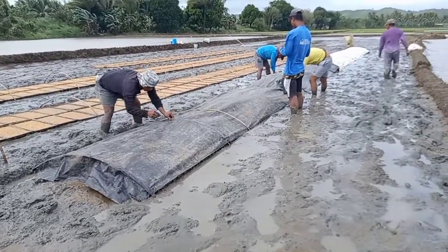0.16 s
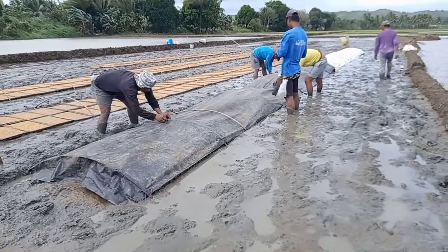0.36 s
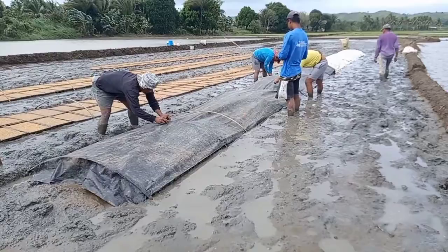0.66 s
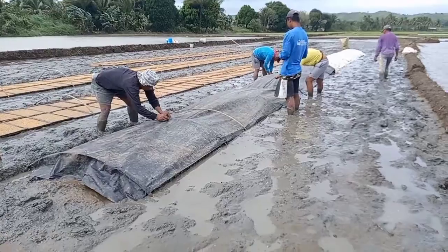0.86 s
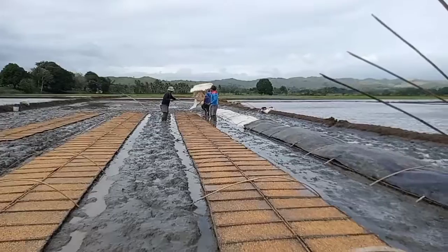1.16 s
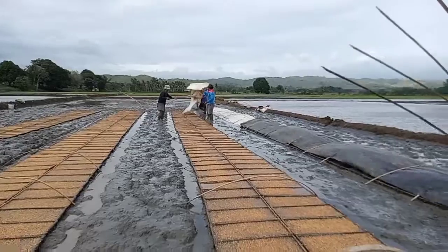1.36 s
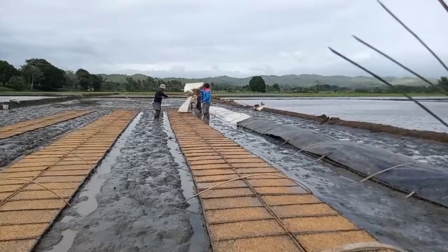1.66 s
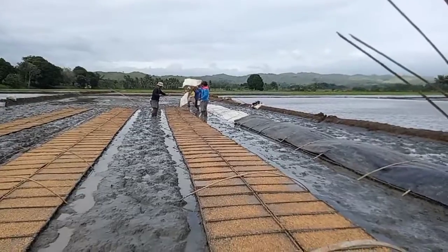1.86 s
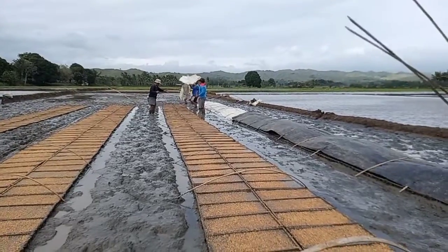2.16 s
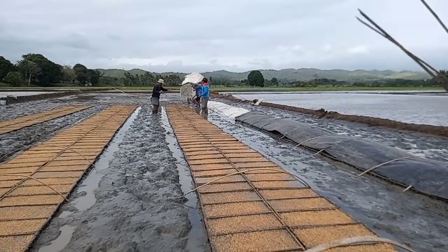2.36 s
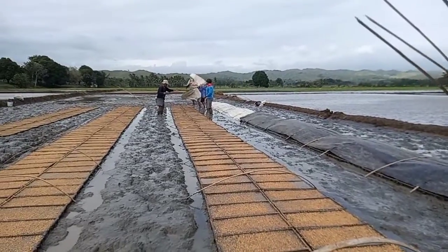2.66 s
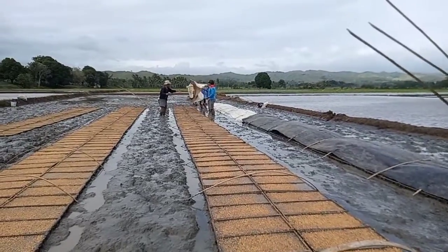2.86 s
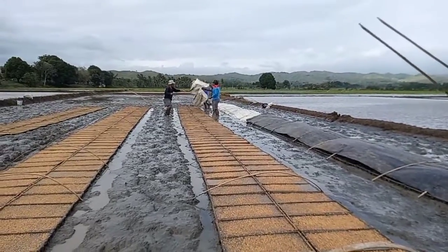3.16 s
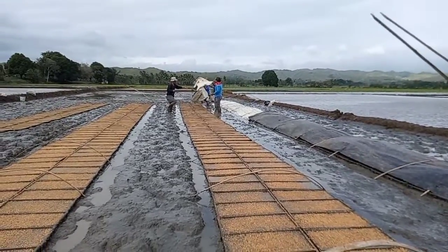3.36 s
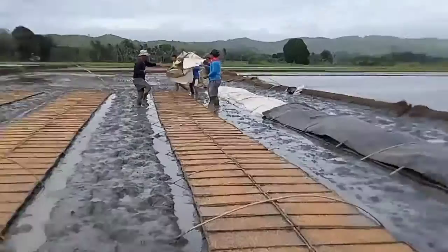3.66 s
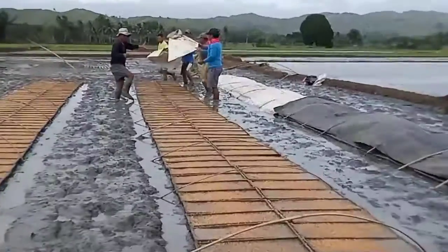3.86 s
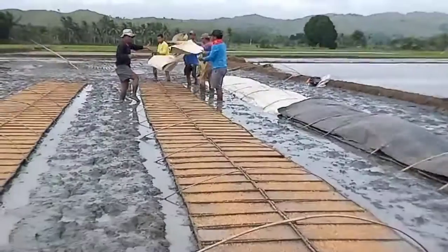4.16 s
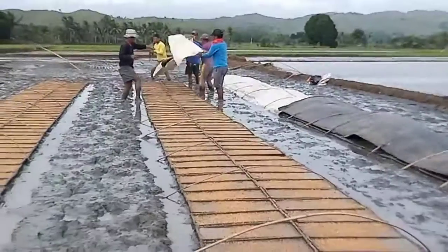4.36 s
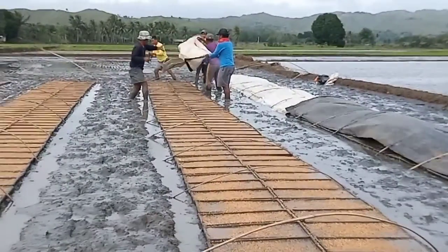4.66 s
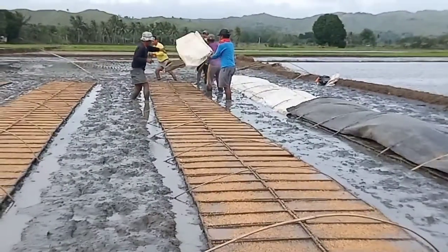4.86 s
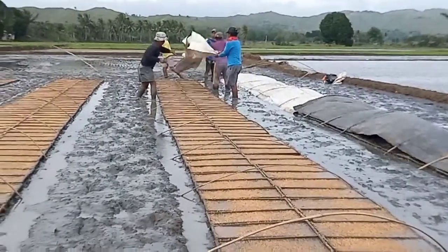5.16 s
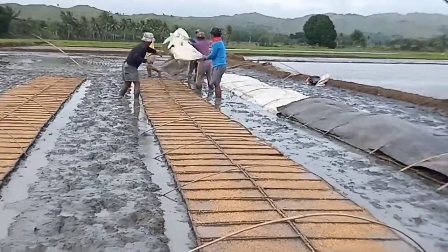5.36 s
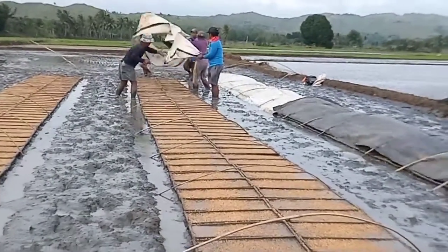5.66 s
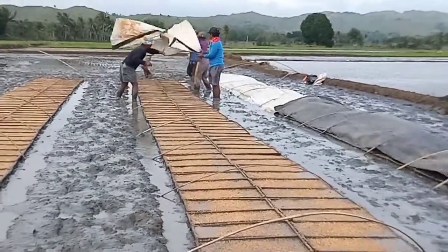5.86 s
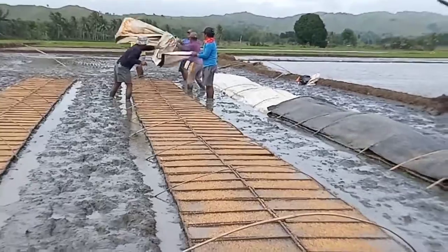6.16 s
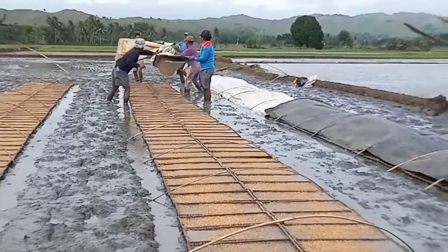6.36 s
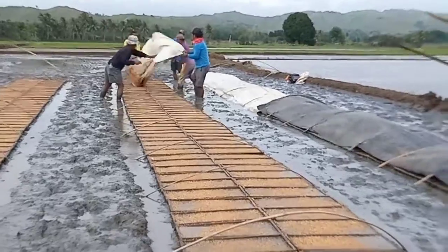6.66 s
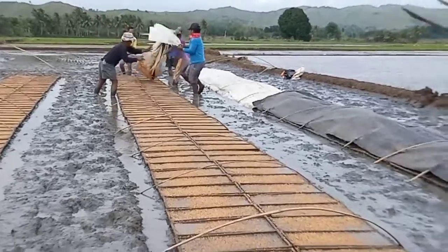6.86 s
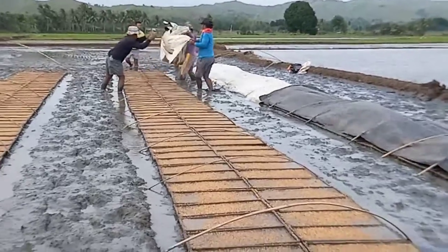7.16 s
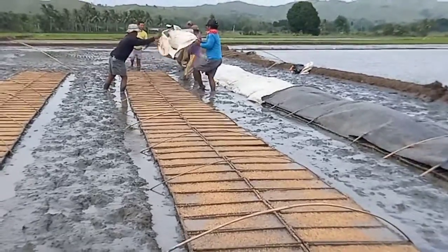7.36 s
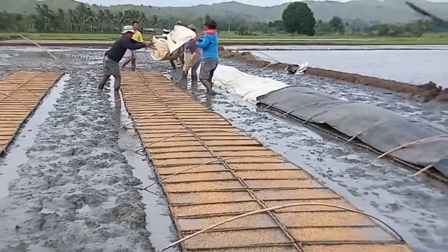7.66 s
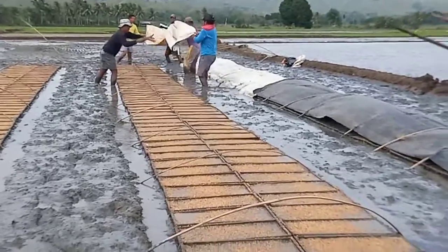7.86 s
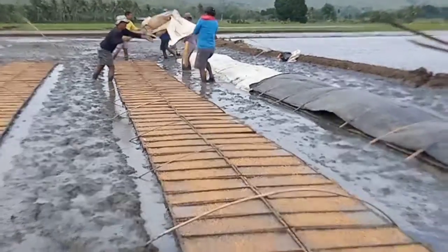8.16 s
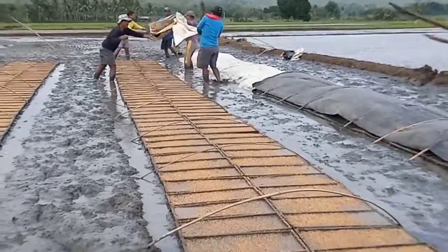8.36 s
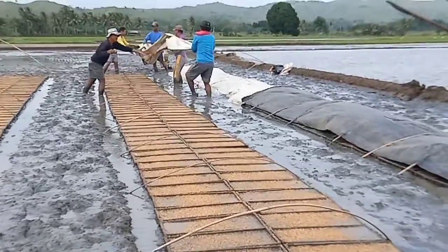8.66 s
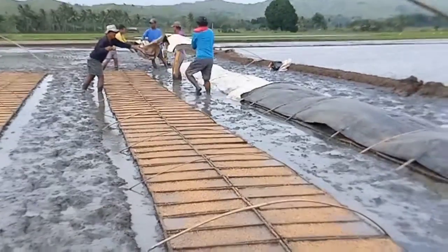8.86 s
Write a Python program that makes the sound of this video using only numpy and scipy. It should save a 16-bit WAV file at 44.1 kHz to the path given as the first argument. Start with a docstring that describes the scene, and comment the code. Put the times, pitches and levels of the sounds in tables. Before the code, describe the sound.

Rough wind hits an unprotected microphone in an open field, rumbling and roaring from the start. It slackens, swells and lands in quick buffets, with a tearing rasp when it blows hardest and a faint airy hiss behind. A few small, close clicks are heard among the gusts. Just past halfway everything drops briefly to dead silence, then the same uneven wind comes straight back.

```python
"""Wind over an open, wet field hits the bare microphone of a handheld camera. From the start, air
swirling at the microphone's opening makes a rumble, a roar and, when it blows hard, a rasp, over a
faint hiss. Soon lulls and gusts slacken and swell it, and single swirls land as short, rough buffets.
The sound cuts out for an instant at 1.1 s. A few light ticks come between 2.8 and 5.5 s; among them,
at 4.8 s, it cuts out again for a third of a second. The wind then blows on to the end at 9 s."""
import sys
import numpy as np
from scipy import signal
from scipy.fft import rfft, irfft
from scipy.io import wavfile
from scipy.ndimage import uniform_filter1d, minimum_filter1d

SR = 44100
rng = np.random.default_rng(int(sys.argv[2]) if len(sys.argv) > 2 else 0)


def master(y):
    """Save y as 16-bit WAV."""
    cut = np.clip(np.atleast_2d(y).T, -1, 1)
    pcm = np.round(cut * 32767)  # scale
    wavfile.write(sys.argv[1], SR, pcm.astype(np.int16))


N = 397782
TIME, HZ = np.arange(N) / SR, np.fft.rfftfreq(N, 1 / SR)


def amp(db):
    """Turns decibels into a number to multiply by."""
    return 10 ** (np.asarray(db) / 20)


def unit_power(x):
    """Scales a signal to an average power of 1."""
    return x / np.sqrt(np.mean(x ** 2) + 1e-20)


def curve_at(points, hz):
    """Reads a curve of (frequency, value) points, joined by straight lines on an octave scale."""
    point_hz, value = np.transpose(points)
    return np.interp(np.log(hz + 1), np.log(point_hz + 1), value)


def coloured(x, spectrum):
    """Gives a sound a tone colour, with a filter that rings after a push lands, never before."""
    log_gain = np.log(amp(curve_at(spectrum, abs(np.fft.fftfreq(8192, 1 / SR)))))
    ringing = np.fft.ifft(np.exp(np.conj(signal.hilbert(log_gain)))).real[:4096]
    return signal.oaconvolve(x, ringing)[:N]


def swirls(slow_hz, fast_hz):
    """The random wobble of swirling air, equally strong in every octave between two rates."""
    cut_slow = (HZ / slow_hz) ** 2 / (1 + (HZ / slow_hz) ** 2)
    shape = cut_slow / np.sqrt(HZ + 1) / (1 + (HZ / fast_hz) ** 4)
    return unit_power(irfft(rfft(rng.standard_normal(N)) * shape, N))


def flutter(wobble, depth_db, span_s):
    """A volume that follows the wobble while its average power over the span stays even."""
    gain = amp(depth_db * 2 * np.tanh(wobble / 2))
    return gain / np.sqrt(uniform_filter1d(gain ** 2, int(span_s * SR) + 1) + 1e-9)


def swell(centre, length, steepness=1):
    """Goes from 0 to 1 and back as a body of air passes: a steep front, then a softer tail."""
    offset = 2 * (TIME - centre) / length
    near, shape = abs(offset) < 4, np.zeros(N)
    offset = offset[near]
    front, tail = abs(steepness * offset) ** 4.1, abs(offset / steepness) ** 3.1
    shape[near] = np.exp(-.55 * np.where(offset < 0, front, tail))
    return shape


# Slow changes in the air. A lean below zero makes the roar hollow; above zero, higher.
# (time [s], flutter depth [dB], rasp brightness [dB], hiss level [dB], lean [dB])
AIR_CHANGES = [(0, 2, 5, -71, -0.5), (1.1, 2.5, 4.5, -62, 1), (1.3, 3, 1, -66.5, 1), (2.2, 6, -3, -54, -3),
               (3.4, 4, -2, -55.5, -1), (4.5, 4, 1.5, -53, 0), (5.8, 3, 2.5, -53, 1),
               (7.299, 4, 1, -61, 1.5), (7.701, 5, 3.5, -62.5, 3.5), (8.3, 3.5, -6.5, -57.5, -0.5),
               (9.002, 4.5, 3.5, -58.5, 3.5)]
def air():
    """The air's slowly drifting flutter depth, brightness, hiss level and lean."""
    times, *columns = np.transpose(AIR_CHANGES)
    return [np.interp(TIME, times, column) for column in columns]


def small_swirls(per_second=9, life_s=0.015, strength=1.4):
    """Small swirls land at random, lift the wind's force quickly and die away."""
    lift = np.zeros(N)
    for place, size, life in rng.random((int(per_second * N / SR), 3)):
        part = lift[int(place * N):][:SR // 5]
        age = TIME[:len(part)] / (life_s * (.5 + life))
        part += 2 * strength * size * np.minimum(10 * age, 1) * np.exp(-age ** 2)
    return lift - lift.mean()


# The wind between gusts.
# (time [s], force [dB], rumble at the usual force [dB], rasp at the usual force [dB])
BREEZE = [(0, -19.5, -22.5, -32), (0.42, -14.5, -25.5, -41), (1.127, -22.5, -21.5, -34),
          (1.135, -29.5, -20.5, -36.5), (1.98, -28.5, -19.5, -48), (2.64, -25, -17.5, -45),
          (3.16, -19.5, -20.5, -53), (3.42, -31, -16, -44), (4.07, -28, -15.5, -45),
          (4.481, -18.5, -18.5, -44.5), (5.479, -19.5, -19, -42.5), (6.17, -24.5, -21, -36.5),
          (6.91, -24, -22.5, -39), (7.49, -20.5, -24.5, -34.5), (7.519, -27, -28, -39),
          (8.1, -32.5, -15.5, -40.5), (8.16, -15, -25, -47), (9.02, -18, -20.5, -46)]
def flow(usual_force_db=-20, rumble_growth=.44, rasp_growth=1.34):
    """One force sets three levels [dB]: the roar matches it, the rumble grows less, the rasp more."""
    times, *columns = np.transpose(BREEZE)
    force_db, rumble_db, rasp_db = (np.interp(TIME, times, column) for column in columns)
    force_db += lulls() + gusts() + small_swirls() * air()[0]
    extra_db = force_db - usual_force_db
    return rumble_db + rumble_growth * extra_db, force_db, rasp_db + rasp_growth * extra_db


def rough_flow(lumpiness=(.65, .8, .7), rasp_roughness=1.1, calm_db=-39):
    """Rumble, roar and rasp levels [dB] once swirls and buffets have shaken the flow."""
    depth_db = air()[0]
    lumps = swirls(slow_hz=4.1, fast_hz=53.4)
    rumble, roar, rasp = (amp(level_db) * flutter(lumps, share * depth_db, span_s=0.13)
                          for level_db, share in zip(flow(), lumpiness))
    rumble, roar, rasp = buffets(rumble, roar, rasp)
    # gentle flow is smooth; hard flow tears off the rim of the opening in very short spurts
    hardness = np.sqrt(rasp / (rasp + amp(calm_db)))
    tearing_db = rasp_roughness * depth_db * hardness
    shiver, spurts = swirls(slow_hz=46.6, fast_hz=252), swirls(slow_hz=160, fast_hz=700)
    roar *= flutter(shiver, depth_db, span_s=0.021)
    rasp *= flutter(shiver, tearing_db, span_s=0.022) * flutter(spurts, tearing_db, span_s=0.02)
    return 20 * np.log10(np.array([rumble, roar, rasp]) + 1e-9)


# Tone colour of wind at the microphone's opening. (frequency [Hz], level [dB])
WIND_COLOUR = [(22, -33), (36, -26.5), (55, -8), (80, 0.5), (130, 3.5), (400, -1.5), (700, -7.5),
               (1400, -19.5), (2800, -33), (3700, -42), (4400, -53), (5400, -71.5), (7000, -79),
               (9500, -86.5)]
# Where rumble, roar and rasp lie, a row each. (low edge [Hz], centre [Hz], high edge [Hz])
WIND_RANGES = [(30, 150, 250), (250, 440, 1000), (1200, 1600, 4500)]
# How the roar's lean lifts or lowers each band. (frequency [Hz], share of the lean [dB per dB])
LEAN_SHARES = [(150, 0.25), (277, -0.58), (510, 0), (940, 0.87), (1735, -0.31)]
def wind(trim_db=(0.6, 1.8, 1.6), steadiness=0.19, wander_db=2.5, glare_from_db=-30.5):
    """Air pushes on the microphone: six bands of noise follow the rumble, roar and rasp."""
    levels_db = rough_flow()
    glare_db = 0.24 * np.maximum(levels_db[2] - glare_from_db, 0)  # a hard rasp gets brighter
    # allow for how much power the opening lets through in each range
    power = amp(curve_at(WIND_COLOUR, HZ)) ** 2
    passed = [power[(HZ > low) & (HZ < high)].sum() / len(HZ) for low, _, high in WIND_RANGES]
    levels_db += (np.array(trim_db) - 10 * np.log10(passed))[:, None]
    centres = [centre for _, centre, _ in WIND_RANGES]
    bands_hz = np.geomspace(centres[0], 2 * centres[-1], num=6)
    noise, pressure = rfft(rng.standard_normal(N)), np.zeros(N)
    _, bright_db, _, lean_db = air()
    lean_db += wander_db * swirls(slow_hz=2.7, fast_hz=35)  # each swirl shifts the roar's tone
    for hz, this_band in zip(bands_hz, np.eye(len(bands_hz))):
        band = irfft(noise * curve_at(list(zip(bands_hz, this_band)), HZ), N)
        # calm the noise's own drift a little, so the flow sets the level
        drift = uniform_filter1d(unit_power(band) ** 2, int(0.13 * SR)) + 1e-6
        band /= drift ** (steadiness / 2)
        blend = np.array([curve_at(list(zip(centres, pick)), hz) for pick in np.eye(len(centres))])
        top_lift_db = this_band[-1] * (bright_db + glare_db)  # highest band only
        pressure += band * amp(blend @ levels_db + top_lift_db + curve_at(LEAN_SHARES, hz) * lean_db)
    # until the sound first cuts out, the treble above 5100 Hz is 8 dB weaker
    treble = (HZ / 5100) ** 20
    dulled = irfft(rfft(pressure) * amp(-8 * treble / (1 + treble)), N)
    return coloured(np.where(TIME < SILENT_GAPS[0][0], dulled, pressure), WIND_COLOUR)


# Tone colour of the field's hiss. (frequency [Hz], level [dB])
HISS_COLOUR = [(300, -0.5), (1500, -4), (2700, -3.5), (3900, -3), (4500, -12.5), (5300, -25), (6800, -24.5),
               (8500, -36.5), (15000, -35.5)]
def hiss(waver_db=2.0):
    """Distant air hisses over the field, wavering a little."""
    level_db = air()[2] + waver_db * swirls(slow_hz=1.6, fast_hz=12)
    return amp(level_db) * unit_power(coloured(rng.standard_normal(N), HISS_COLOUR))


# Moments when the wind slackens. (middle time [s], length [s], change in force [dB])
WIND_LULLS = [(0.206, 0.092, -4.5), (0.644, 0.036, -5.5), (2.045, 0.047, -24), (2.402, 0.16, -1),
              (3.474, 0.041, -10), (3.912, 0.032, -7.5), (4.23, 0.076, -10), (5.782, 0.075, -11.5),
              (7.606, 0.077, -11), (7.855, 0.053, -17), (8.553, 0.028, -11.5), (8.906, 0.028, -8.5)]
def lulls():
    """Slower air passes and lowers the wind's force [dB]."""
    return sum(change_db * swell(centre, length) for centre, length, change_db in WIND_LULLS)


# Single swirls that hit the opening. (middle time [s], length [s], roar level [dB], rasp level [dB])
SWIRL_HITS = [(0.365, 0.014, -9, -25.5), (0.744, 0.033, -16, -25.5), (1.494, 0.0072, -20.5, -26),
              (1.766, 0.018, -15, -28.5), (1.871, 0.018, -19.5, -35.5), (2.082, 0.01, -13, -29),
              (2.168, 0.0067, -16.5, -33), (2.27, 0.016, -14, -21), (2.315, 0.045, -11, -25.5),
              (2.46, 0.0053, -6.5, -53), (2.573, 0.009, -11.5, -33.5), (2.903, 0.021, -13.5, -30.5),
              (3.119, 0.023, -12.5, -27.5), (3.222, 0.04, -15, -24.5), (3.643, 0.031, -10.5, -31),
              (3.864, 0.021, -16.5, -36.5), (4.073, 0.02, -12.5, -30), (4.194, 0.0097, -16, -45.5),
              (4.276, 0.046, -14, -29), (4.393, 0.018, -13, -22), (4.582, 0.02, -2, -24.5),
              (4.731, 0.0093, -14.5, -22), (5.192, 0.016, -15.5, -43.5), (5.259, 0.038, -19, -25.5),
              (5.362, 0.0042, -25, -19), (5.461, 0.012, -13.5, -21.5), (5.899, 0.027, -15, -25),
              (5.953, 0.015, -13, -21), (5.99, 0.016, -8, -27.5), (6.064, 0.022, -13, -26),
              (6.361, 0.012, -5.5, -26), (6.518, 0.021, -16.5, -32), (7.135, 0.015, -13.5, -20.5),
              (7.174, 0.0096, -19, -20.5), (7.886, 0.028, -22, -45), (7.964, 0.0057, -17.5, -53),
              (8.186, 0.0067, -15, -30.5), (8.401, 0.026, -16.5, -25.5), (8.511, 0.013, -16.5, -31.5)]
def buffets(rumble, roar, rasp, push_db=-7.5):
    """Each swirl shoves the flow aside: it takes over the roar and rasp and adds to the rumble."""
    for centre, length, roar_db, rasp_db in SWIRL_HITS:
        blow = swell(centre, length, steepness=1.115)
        roar = roar + (amp(roar_db) - roar) * blow
        rasp = rasp + (amp(rasp_db) - rasp) * blow ** 2  # only in the hardest part of the blow
        rumble = np.sqrt(rumble ** 2 + (amp(roar_db + push_db) * blow) ** 2)
    return rumble, roar, rasp


# Moments when the wind swells. (middle time [s], length [s], rise in force [dB])
WIND_GUSTS = [(0.551, 0.099, 3.5), (1.008, 0.037, 6.5), (1.305, 0.029, 5), (1.71, 0.032, 11.5),
              (2.3, 0.13, 6), (2.509, 0.028, 15.5), (3.065, 0.062, 13.5), (3.243, 0.15, 9),
              (3.793, 0.056, 13), (4.026, 0.032, 6.5), (5.388, 0.042, 6.5), (5.528, 0.054, 12),
              (5.875, 0.06, 5.5), (6.365, 0.067, 9.5), (6.6, 0.057, 6.5), (6.687, 0.036, 12.5),
              (7.1, 0.16, 10), (7.396, 0.053, 10), (8.25, 0.043, 3)]
def gusts():
    """Faster air passes and raises the wind's force [dB]."""
    return sum(rise_db * swell(centre, length) for centre, length, rise_db in WIND_GUSTS)


# Stretches with no sound. (start time [s], end time [s])
SILENT_GAPS = [(1.127, 1.129), (4.796, 5.177)]
def cut_outs(sound):
    """The sound stops dead, then comes straight back."""
    for start, end in SILENT_GAPS:
        sound = sound * ((TIME < start) | (TIME > end))
    return sound


# Light ticks. (time [s], level before colouring [dB])
LIGHT_TICKS = [(2.781, -43), (3.31, -25.5), (3.427, -34.5), (5.198, -25.5), (5.45, -28)]
def ticks(decay_s=0.0053, ring_hz=3900):
    """Small bright clicks close by, each a few milliseconds of fading noise."""
    loudness = sum(amp(db) * np.exp(-abs(TIME - start) / decay_s) * (TIME >= start)
                   for start, db in LIGHT_TICKS)
    colour = [(ring_hz / 2, 1), (ring_hz, 7), (1.19 * ring_hz, -12), (3 * ring_hz, -36)]
    return coloured(loudness * rng.standard_normal(N), colour)


def limiter(sound, ceiling=.95):
    """The volume dips smoothly for a few milliseconds to keep the hardest pushes under a ceiling."""
    needed_gain = (1 + (abs(sound) / ceiling) ** 6) ** (-1 / 6)
    held_gain = minimum_filter1d(needed_gain, size=133)
    return sound * uniform_filter1d(uniform_filter1d(held_gain, size=67), size=67)


def scene():
    """Wind on the microphone over the field's hiss and ticks, in one channel."""
    return (wind() + hiss() + ticks())[None]


def record(dry):
    """Peaks are tamed; the sound drops out twice, fades at the very end and loses its top treble."""
    sound = cut_outs(limiter(dry[0]))
    sound *= np.minimum((TIME[-1] - TIME) / .004, 1)  # 4 ms fade
    treble_cut = signal.firwin(511, cutoff=15500, window=("kaiser", 9), fs=SR)
    return signal.oaconvolve(sound, treble_cut, "same")[None]


dry = scene()
out = record(dry)
master(out)
```